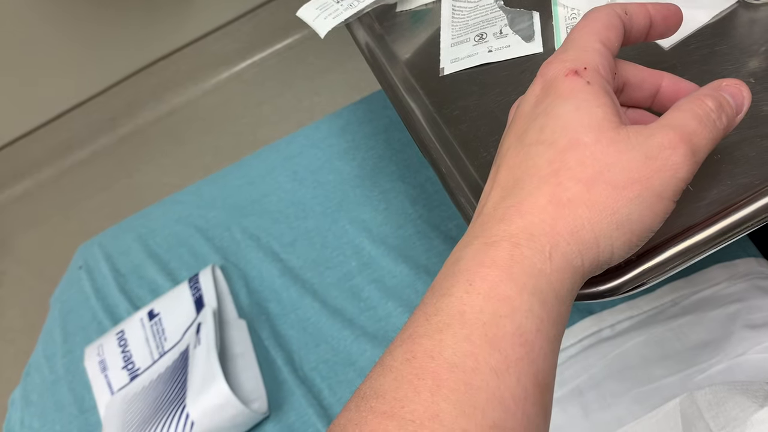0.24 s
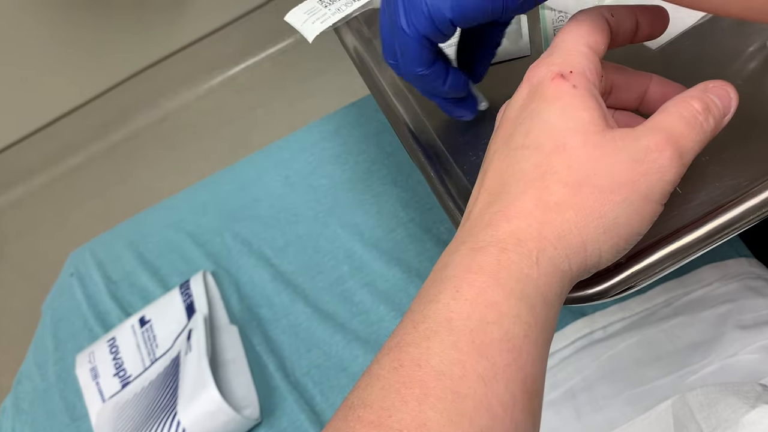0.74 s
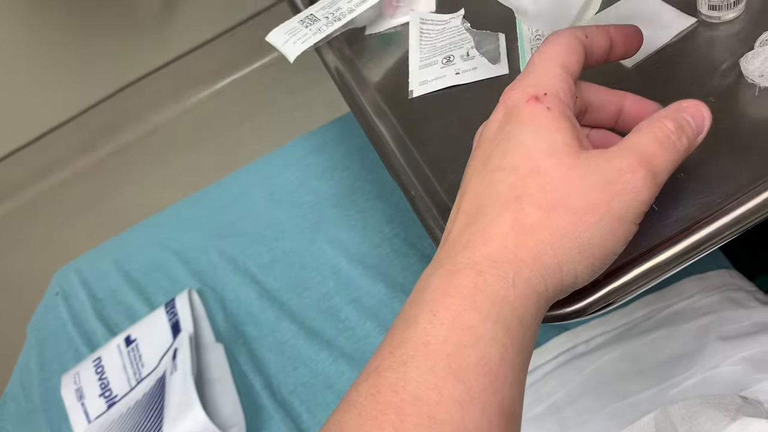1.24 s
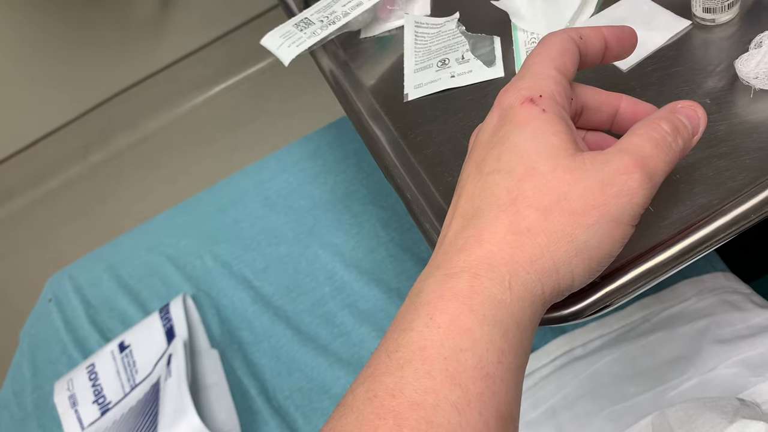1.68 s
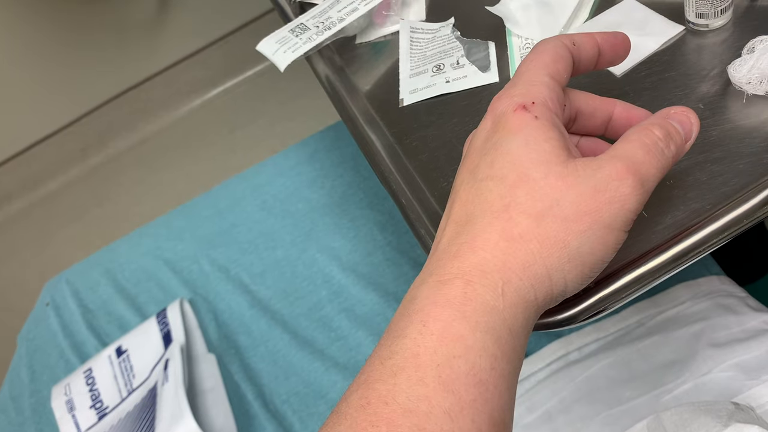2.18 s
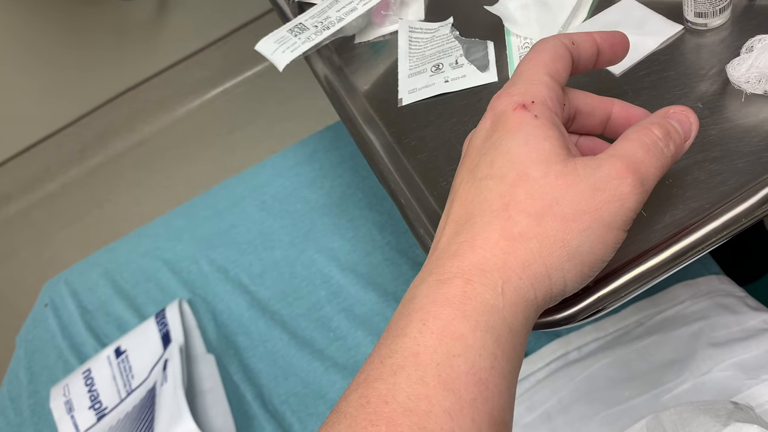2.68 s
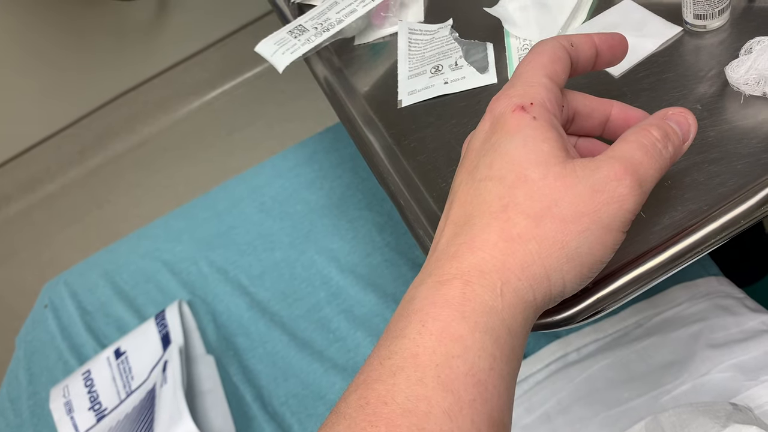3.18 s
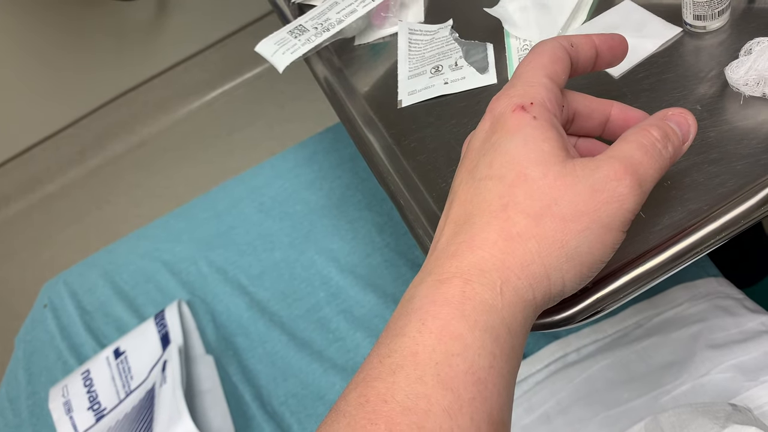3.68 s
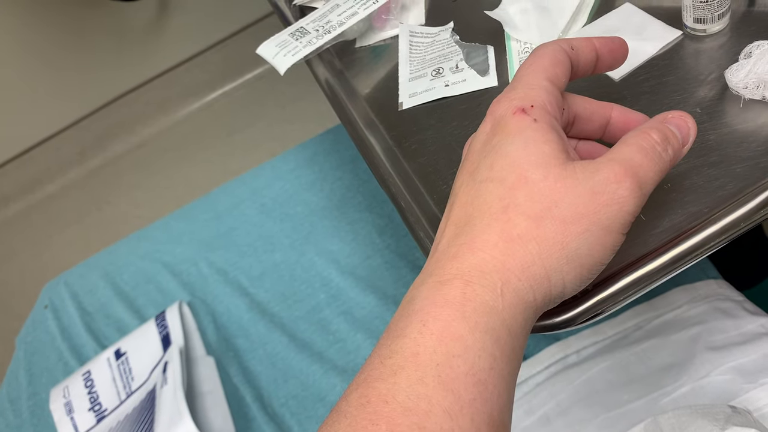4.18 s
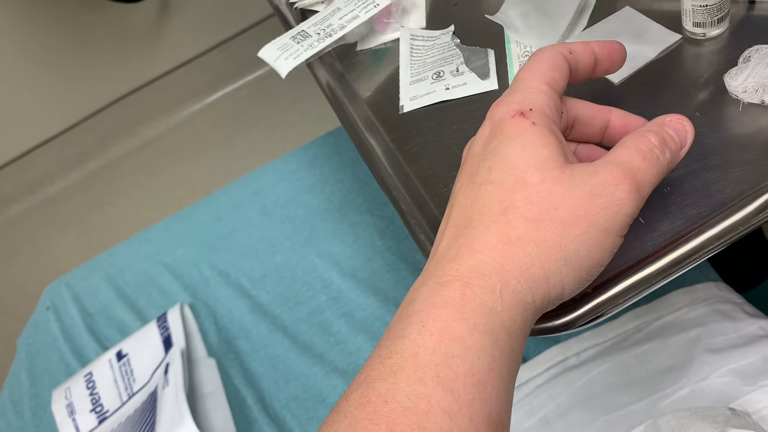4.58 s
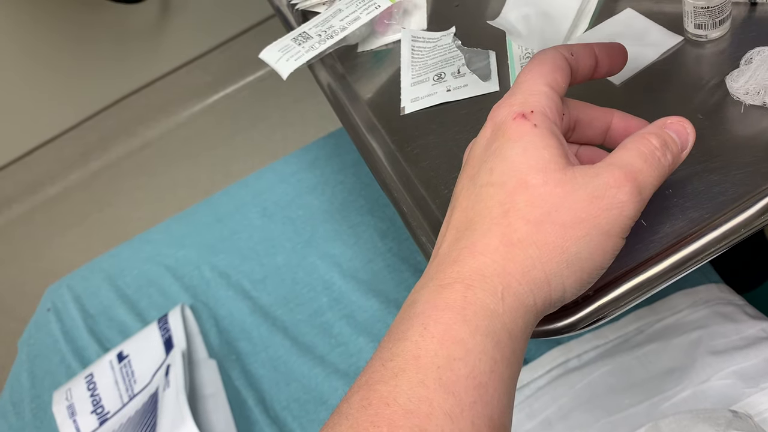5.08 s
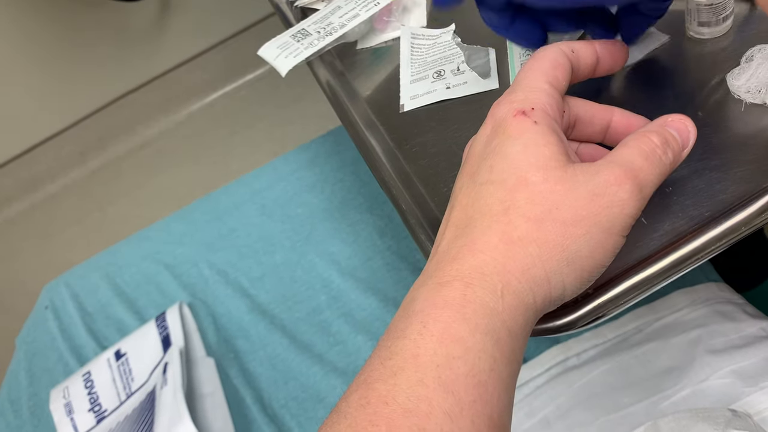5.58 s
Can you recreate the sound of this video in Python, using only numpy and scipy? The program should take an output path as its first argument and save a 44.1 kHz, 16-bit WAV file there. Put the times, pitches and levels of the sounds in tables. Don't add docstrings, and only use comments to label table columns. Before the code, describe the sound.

In a small hard medical room, faint low ventilation sits beneath close handling. Slight paper ticks and soft low bumps on the phone come first; then one wrapper rips and crackles, a second pops open more loudly and is crumpled. Loose sheets rustle, a steel tray is knocked, and a pad comes away with a thud and short ring. Hand-held stereo phone, hands slightly right.

```python
import sys
import numpy as np
from scipy import signal
from scipy.fft import rfft, irfft, next_fast_len
from scipy.io import wavfile
from scipy.ndimage import uniform_filter1d, map_coordinates

SR = 44100
rng = np.random.default_rng(int(sys.argv[2]) if len(sys.argv) > 2 else 0)


def undo_db(level):
    steps = np.asarray(level, float) / 20
    return 10 ** steps


def generate_wav(sig):
    pcm = np.round(np.clip(np.atleast_2d(sig).T, -1, 1) * 32767).astype(np.int16)
    wavfile.write(sys.argv[1], SR, pcm)


N = 257984

# t/s, peak
# level/dB, paper body re peak/dB
CREASE_SNAPS = [(1.692, -48.5, -8), (1.759, -50.5, 6), (1.7685, -23.5, -24), (1.7731, -26, -38),
                (1.781, -25.5, -12), (1.7984, -26.5, -16), (1.902, -40.5, -29), (1.914, -41.5, -33),
                (1.9428, -37, -44), (1.951, -42.5, -32), (2.0182, -41, -29), (2.0356, -30.5, -31),
                (2.0576, -38, -17), (2.0657, -29, -30), (2.0797, -31, -25), (2.1222, -46, -11),
                (2.1417, -34, -13.5), (2.201, -43, -40), (2.2178, -40.5, -23), (2.3, -43, -16),
                (2.323, -36.5, -33), (2.3362, -37.5, -24), (2.393, -40, -26), (2.4086, -39.5, -14),
                (2.4467, -41, -17), (2.4726, -35.5, -22), (2.5029, -32.5, -33), (2.5464, -48.5, -30),
                (2.5656, -38.5, -30), (2.604, -31.5, -24.5),
                (2.701, -46.5, -30), (2.7385, -15.5, -32), (2.7456, -17, -25.5), (2.748, -11, -27),
                        (2.7547, -17, -20), (2.7577, -13.5, -25), (2.869, -35, -16.5), (2.8784, -38, -18.5),
                        (2.897, -38, -38), (2.92, -42.5, -21), (2.9547, -33.5, -18.5), (2.97, -33.5, -31),
                        (2.9913, -33, -34), (3.0119, -38, -12), (3.0534, -36.5, -37), (3.0813, -42, -26),
                        (3.093, -55, 3.5), (3.109, -33, -16.5), (3.163, -39.5, -25), (3.1883, -38.5, -37),
                        (3.218, -46, -24), (3.2446, -37, -25), (3.2716, -46, -22), (3.2964, -42, -31),
                        (3.3228, -47, -39), (3.3882, -48.5, -32), (3.463, -43.5, -32), (3.4727, -55, -8),
                        (3.5831, -52.5, -14), (3.6021, -51.5, -21),
                (0.0104, -45, -41), (0.0635, -45.5, -30), (0.0933, -50.5, -35), (0.1704, -40.5, -34),
                     (0.1914, -45.5, -40), (0.287, -43.5, -27.5), (1.2615, -56, -34), (1.406, -57.5, -25),
                     (3.9039, -49, -28), (3.9855, -50, -18), (4.0312, -45.5, -20.5), (4.0505, -38.5, -34),
                     (4.079, -38.5, -40), (4.0634, -43, -30), (4.104, -45, -17.5), (4.1818, -35.5, -46),
                     (4.1936, -50, -30), (4.2255, -37, -19), (4.3374, -43.5, -22.5), (4.4674, -38.5, -30),
                     (4.5109, -41.5, -31), (4.5958, -29.5, -26), (4.965, -54.5, -11), (5.0477, -52, -37),
                     (5.1371, -55, -30), (5.2954, -43.5, -13.5), (5.5775, -39, -27), (5.6392, -23.5, -13.5),
                     (5.6562, -46, -14.5)]
CREASE_HZ, CREASE_SPREAD_DB, DULLING_DB = 9540, -1.53, 1.94
BODY_LIMIT_DB = -20

# peak t/s, film level/dB, paper level/dB, rise over 20 dB/s, fall over 20 dB/s
SEAM_TEARS = [
    (1.711, -51, -54.5, 0.025, 0.064),
    (1.778, -30.5, -46, 0.02, 0.072),
    (2.759, -34, -56, 0.035, 0.096),
    (5.64, -40.5, -55, 0.012, 0.11),
]
# peak t/s, film level/dB, paper level/dB,
# rise over 20 dB/s, fall over 20 dB/s
SHEET_RUSTLES = [(0.03, -61.5, -62, 0.6, 0.28), (1.225, -69, -95, 0.032, 0.04),
                 (1.372, -70.5, -60.5, 0.024, 0.052), (1.946, -41, -88, 0.027, 0.01),
                 (2.0, -61, -87, 0.16, .2), (2.077, -44, -49, 0.045, 0.098), (2.235, -49, -64, 0.086, 0.19),
                 (2.443, -47.5, -60, 0.064, 0.1), (2.62, -55.5, -89, 0.9, 0.13),
                 (2.87, -52.5, -61, 0.054, 0.32), (3.193, -55, -63, .4, 0.079),
                 (3.374, -66, -84, 0.15, 0.21), (3.502, -62, -62, 0.14, 0.15), (3.92, -68, -84, 0.28, 0.53),
                 (4.202, -45, -64, 0.19, 0.067), (4.339, -61, -88, 0.093, 0.08),
                 (4.474, -53, -69, 0.061, 0.11), (4.619, -56, -63, 0.059, 0.16),
                 (4.78, -71.5, -68.5, 0.051, 0.12), (4.915, -63, -86, 0.14, 0.5), (5.13, -77, -81, .1, 0.1),
                 (5.25, -51.5, -74, 0.12, 0.11), (5.476, -61, -65, .015, 0.58), (5.62, -74, -56, 0.19, 0.42),
                 (0.4, -68, -89, .3, .5),
]
PAPER_STEEPER = 1.5
CLUMP_DB = 3.5
PATCH_DB = 3

# f/Hz, density level/dB
FILM_COLOUR = [(1500, -36.5), (2500, -18.5), (4000, -14.5), (5200, -4.5), (7000, -9.5), (8300, 1),
               (9400, -3.5), (11300, -0.5), (13500, -3.5), (15500, -5.5), (16500, -23.5)]
# f/Hz, density level/dB
PAPER_COLOUR = [(300, -31.5), (600, -9.5), (1000, -3.5), (2000, 5), (3000, 5.5), (4500, -2), (8000, -28)]

# t/s, thud level/dB, ring level/dB, thud t60/s
TRAY_KNOCKS = [(1.673, -56.5, -65, 0.022), (1.723, -58, -85, 0.018), (1.695, -54.5, -79, 0.027),
               (4.593, -35.5, -63, 0.019), (4.607, -42.5, -75, 0.015), (4.665, -50, -66, 0.023),
               (4.966, -66.5, -90, 0.12), (5.482, -60, -75, 0.033), (5.531, -55.5, -69, 0.026),
               (5.554, -55, -78, 0.028), (5.576, -50.5, -61, 0.024), (5.61, -55, -63, 0.041),
               (5.638, -42.5, -35, 0.15)]
# f/Hz, level/dB, t60/s
TRAY_MODES = [(431, -15, .15), (732, 0, .2), (894, -12, .2), (985, -13, .15), (1270, -8, .08),
              (1459, -12, .1), (2100, -8, .05)]
# f/Hz, width/Hz, level/dB
THUD_RESONANCES = [(362, 990, -3.5), (684, 930, -10), (980, 360, 3), (1280, 1140, 3.5), (1870, 1400, 1)]

# t/s, level/dB, f/Hz
LOW_BUMPS = [
    (0.439, -31.5, 57.7),
    (0.454, -33.5, 85.5),
    (0.464, -29, 121),
    (0.494, -34.5, 68.6),
    (0.548, -39.5, 65.6),
    (0.722, -40, 52),
    (0.871, -42.5, 52.3),
    (5.64, -35, 330),
]

# f/Hz, density level/dB
AIR_COLOUR = [(13, -41), (22, -33), (48, -0.5), (98, -3.5), (123, -3.5), (178, -4.5), (266, -10.5),
              (360, -16), (398, -21.5), (478, -21), (691, -32.5), (1200, -38.5), (1560, -75.5),
              (2640, -120)]
# f/Hz, left-right likeness
AIR_LIKENESS = [(25, 0.77), (60, 1), (240, 0.67), (950, 0.11), (3770, 0.014), (15000, 0.058)]
# f/Hz, width/Hz, level/dB
DUCT_RESONANCES = [(189.6, 33, -64.5), (234.5, 40, -64)]
AIR_DB = -53
BLADE_HZ, BLADE_DB = 473.6, -73.5

# f/Hz, t60/s
ROOM_DECAY = [(500, 0.21), (3000, 0.25), (9000, 0.13), (15000, 0.02)]
# f/Hz, level/dB
WALL_LEVEL = [(500, -13), (1500, -13), (3000, -11), (6000, -8.5), (10000, -8), (15000, -13)]
# f/Hz, lag/samples
LEFT_PORT_LAG = [(1000, 4), (2500, 6), (5000, 13)]
# t/s, level/dB
LEFT_PORT_LEVEL = [
    (0, 0.5),
    (1.6, -2),
    (2.9, -3),
    (3.1, -3.5),
    (5.85, -2.5),
]
TRAY_LAG = 6

# f/Hz, density level/dB
SELF_NOISE = [(400, 0), (1000, 2), (2000, 2), (4000, 0), (8000, 0), (10500, 1), (13800, -2), (14500, -6),
              (15000, -22), (16500, -40)]
HISS_DB = -77
# f/Hz, width/Hz, level/dB
CHANNEL_DIPS = [
    [(3100, 500, -1.5), (8700, 200, -4), (11700, 650, -11), (15000, 500, -8), (16600, 650, -26)],
    [(1150, 400, -6), (10300, 400, -7), (13500, 500, -9), (16600, 650, -24)],
]
TOP_HZ = 16750


def snaps():
    creases = CREASE_SNAPS
    s, db, body_db = np.transpose(creases)[:, :, None]
    t = np.arange(-200, 500) / SR
    draw = rng.standard_normal((len(s), 2, len(t)))
    dulling = DULLING_DB * np.maximum(body_db - BODY_LIMIT_DB, 0)
    hz = CREASE_HZ * undo_db(CREASE_SPREAD_DB * draw[:, 0, :1] - dulling)
    size = undo_db(0.16 * (db + 33.5))

    def shape(rise, t60):
        return undo_db(np.minimum(60 * t / rise, -60 * t / t60) / size)

    ring = np.sin(2 * np.pi * hz * t) * shape(0.002, 0.003)
    crack = draw[:, 0] * shape(0.005, 0.006)
    tick = draw[:, 1] * shape(0.022, 0.025)
    crack = crack / np.abs(crack).max(axis=1, keepdims=True)
    tick = tick / np.abs(tick).max(axis=1, keepdims=True)
    start = s[:, 0] + t[0] + 0.0003
    rings = placed(start, undo_db(db - 3.0) * ring)
    cracks = coloured(placed(start, undo_db(db + 6) * crack), FILM_COLOUR)
    ticks = coloured(placed(start, undo_db(db + body_db + 10.5) * tick), PAPER_COLOUR)
    return rings + cracks + ticks


def crumple():
    film_power, paper_power = np.zeros(N), np.zeros(N)
    t = np.arange(N) / SR
    for s, film_db, paper_db, rise, fall in SEAM_TEARS + SHEET_RUSTLES:
        below_db = 20 * np.maximum((s - t) / rise, (t - s) / fall)
        film_power += undo_db(2 * (film_db - below_db))
        paper_power += undo_db(2 * (paper_db - PAPER_STEEPER * below_db))
    film = crackle(count=8000, spread_db=3.4, hiss=0.45, centre_hz=7000, cycles=0.8)
    paper = crackle(count=3000, spread_db=3.6, hiss=0.45, centre_hz=1600, cycles=1.2)
    film = np.sqrt(film_power) * unit(coloured(film, FILM_COLOUR))
    paper = np.sqrt(paper_power) * unit(coloured(paper, PAPER_COLOUR))
    return patchy(undo_db(0.5) * film + undo_db(-3.0) * paper, PATCH_DB)


def crackle(count, spread_db, hiss, centre_hz, cycles):
    draw = rng.random((count, 3))
    t = np.arange(120) / SR
    hz = np.clip(centre_hz * undo_db(13.9 * (draw[:, 2:] - 1.5)), 300, 16000)
    size = undo_db(-spread_db * np.log(draw[:, 1:2] + 0.0071))
    slip = np.sqrt(hz) * np.sin(2 * np.pi * hz * t) * np.exp(-t * hz / cycles)
    slips = placed(draw[:, 0] * N / SR, size * slip)
    clumps = undo_db(CLUMP_DB * wobble(80))
    return unit(clumps * (unit(slips) + hiss * rng.standard_normal(N)))


def patchy(x, depth_db):
    z = signal.stft(x, nperseg=256)[2]
    field = uniform_filter1d(rng.standard_normal(z.shape), size=7, axis=0)
    field = uniform_filter1d(field, size=10, axis=1)
    return signal.istft(z * undo_db(depth_db * unit(field)), nperseg=256)[1][:N]


def tray():
    rings, pushes = np.zeros(N + SR), np.zeros(N + SR)
    t = np.arange(SR // 2) / SR
    ring = sum(undo_db(db - 60 * t / t60) * np.sin(2 * np.pi * hz * t) for hz, db, t60 in TRAY_MODES)
    ring = ring * (1 - np.exp(-t / 0.0005))
    for s, thud_db, ring_db, thud_t60 in TRAY_KNOCKS:
        start = round(s * SR)
        rings[start:][:len(t)] += undo_db(ring_db) * ring
        push = undo_db(thud_db + 21 - 60 * t / thud_t60) * (1 - np.exp(-t / 0.0018))
        pushes[start:][:len(t)] += push * rng.standard_normal(len(t))

    def sheet(f):
        total = 0
        for k, (c, w, db) in enumerate(THUD_RESONANCES):
            total = total + (-1) ** k * undo_db(db) * 1j * f * w / (c * c - f * f + 1j * f * w)
        return total

    return rings[:N] + filtered(pushes[:N], sheet)


def bumps():
    s, db, hz = np.transpose(LOW_BUMPS)[:, :, None]
    t = np.arange(-1800, 1800) / SR
    push = undo_db(db) * np.sin(2 * np.pi * hz * t) * np.exp(-(t * hz / 0.47) ** 2)
    return placed(s[:, 0] + t[0], push) * undo_db([[-0.8], [0.8]])


def ventilation():
    def mid_side(hz):
        angle = np.arccos(np.clip(along(AIR_LIKENESS, hz), -1, 1)) / 2
        return undo_db(along(AIR_COLOUR, hz)) * [np.cos(angle), np.sin(angle)]

    noise = undo_db(0.27 * wobble(2.3)) * rng.standard_normal((2, N))
    mid, side = filtered(noise, mid_side)
    air = undo_db(AIR_DB) * unit(np.array([mid + side, mid - side]))
    for hz, width_hz, db in DUCT_RESONANCES:
        hum = filtered(rng.standard_normal(N), lambda f: np.exp(-2 * ((f - hz) / width_hz) ** 2))
        air += undo_db(db) * unit(hum)
    turns = np.cumsum(BLADE_HZ + 2.5 * wobble(6.6)) / SR
    air += undo_db(BLADE_DB + 2.5 + 1.4 * wobble(8)) * np.sin(2 * np.pi * turns)
    return air * undo_db([[-1.2], [1.2]])


def room(x):
    out, step = np.zeros((2, N + SR)), SR // 4
    for start in range(0, N, step):
        hz, t, z = signal.stft(rng.standard_normal((2, SR // 2)), SR, nperseg=256)
        decay = undo_db(-60 * t / along(ROOM_DECAY, hz)[:, None])
        tail = signal.istft(z * decay, SR, nperseg=256)[1]
        tail = tail / np.linalg.norm(tail[0])
        wet = signal.fftconvolve(x[None, start:start + step], tail, axes=1)
        first = start + 120
        out[:, first:first + wet.shape[1]] += wet
    return filtered(out[:, :N], lambda hz: undo_db(along(WALL_LEVEL, hz)))


def unit(x):
    return x / np.sqrt(np.mean(x ** 2) + 1e-20)


def along(points, hz):
    f, v = np.transpose(points)
    return np.interp(np.log(hz + 1), np.log(f + 1), v)


def wobble(rate):
    knots = rng.standard_normal(int(N * rate / SR) + 4)
    return map_coordinates(knots, [np.arange(N) * rate / SR])


def filtered(x, response):
    m = next_fast_len(N + SR // 2)
    return irfft(rfft(x, m) * response(np.fft.rfftfreq(m, 1 / SR)), m)[..., :N]


def coloured(x, spectrum):
    def response(hz):
        db = along(spectrum, hz)
        return undo_db(db) / np.sqrt(np.mean(undo_db(2 * db)))

    return filtered(x, response)


def placed(times, shapes):
    at = np.round(np.asarray(times) * SR).astype(int)[:, None] + np.arange(shapes.shape[1])
    return np.bincount(at.ravel(), shapes.ravel(), N + SR)[:N]


def scene():
    wrappers, steel = snaps() + crumple(), tray()
    right = wrappers + steel
    late = filtered(wrappers, lambda hz: np.exp(-2j * np.pi * hz * along(LEFT_PORT_LAG, hz) / SR))
    late = late + np.pad(steel, (TRAY_LAG, 0))[:N]
    left = undo_db(np.interp(np.arange(N) / SR, *np.transpose(LEFT_PORT_LEVEL))) * late
    return np.array([left, right]) + room(right) + ventilation() + bumps()


def low_pass(x):
    return signal.sosfilt(signal.butter(12, 16830, fs=SR, output="sos"), x)


def record(dry):
    def dips(hz):
        gains = []
        for rows in CHANNEL_DIPS:
            db = sum(depth * np.exp(-((hz - c) / w) ** 4) for c, w, depth in rows)
            gains.append(undo_db(db) * (hz < TOP_HZ))
        return np.array(gains)

    left, right = dry + undo_db(HISS_DB) * coloured(rng.standard_normal((2, N)), SELF_NOISE)
    mid, side = filtered(np.array([left + right, left - right]) / 2, dips)
    return low_pass(np.array([mid + side, mid - side]))


dry = scene()
out = record(dry)
generate_wav(out)
```